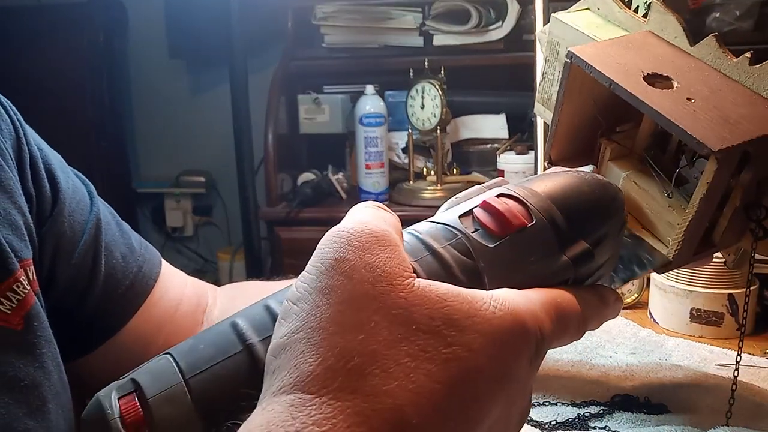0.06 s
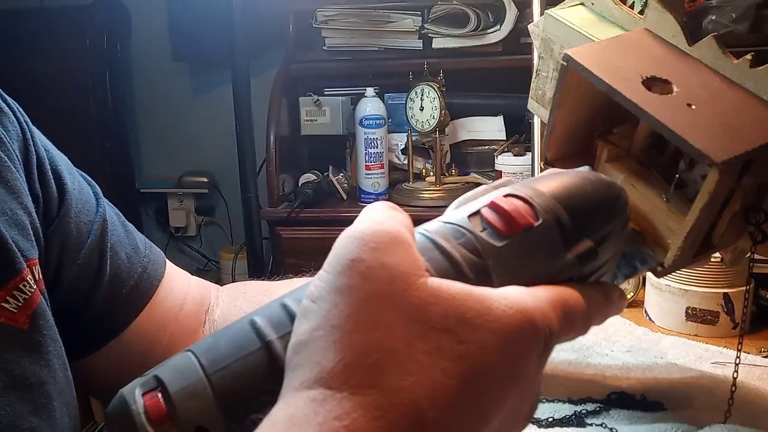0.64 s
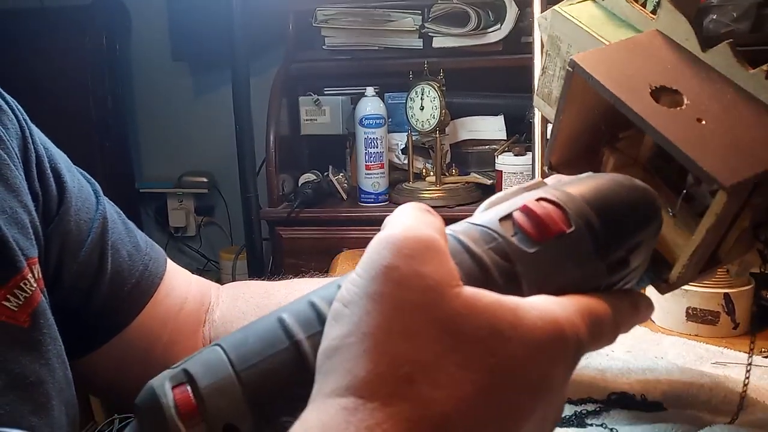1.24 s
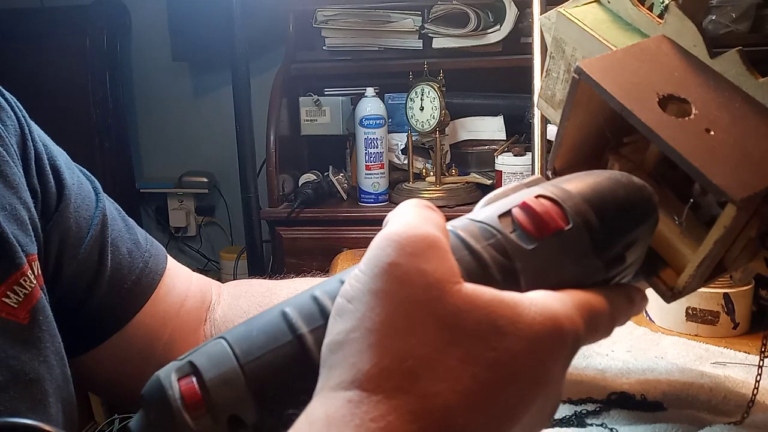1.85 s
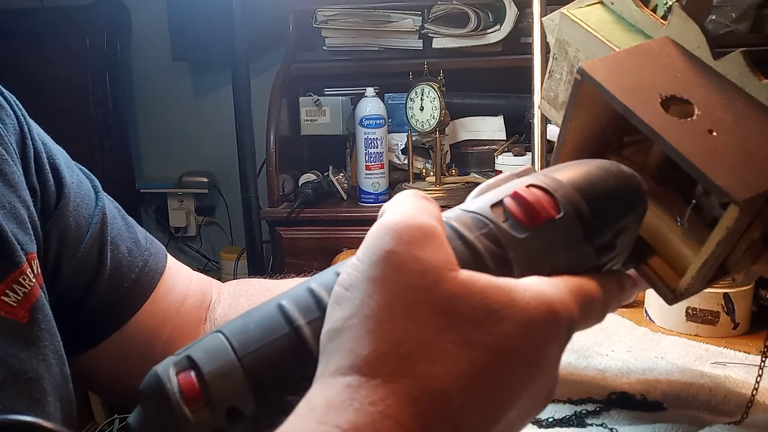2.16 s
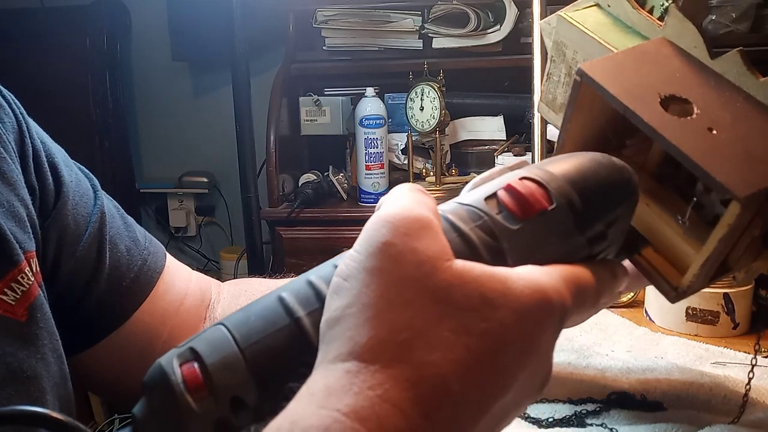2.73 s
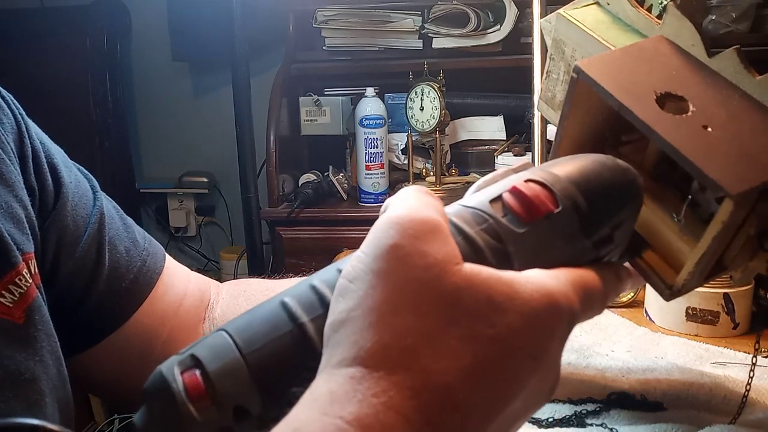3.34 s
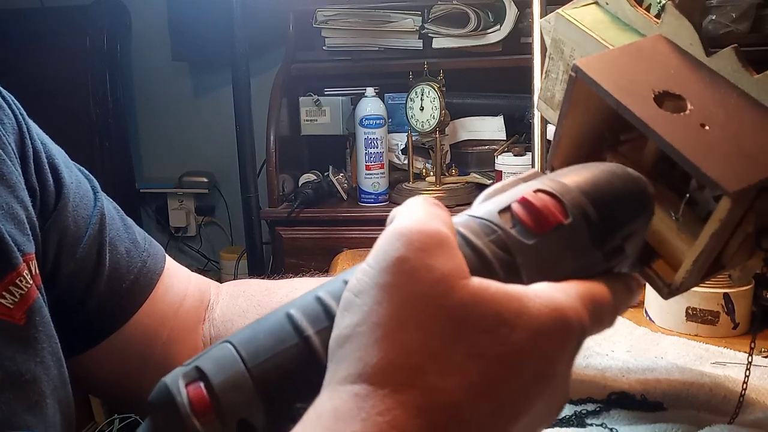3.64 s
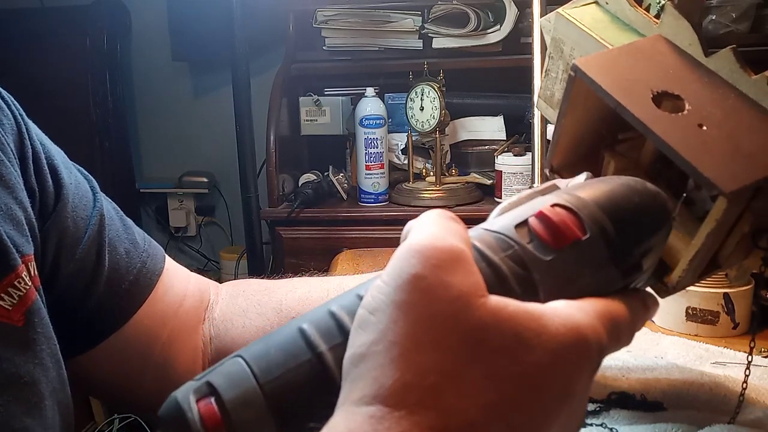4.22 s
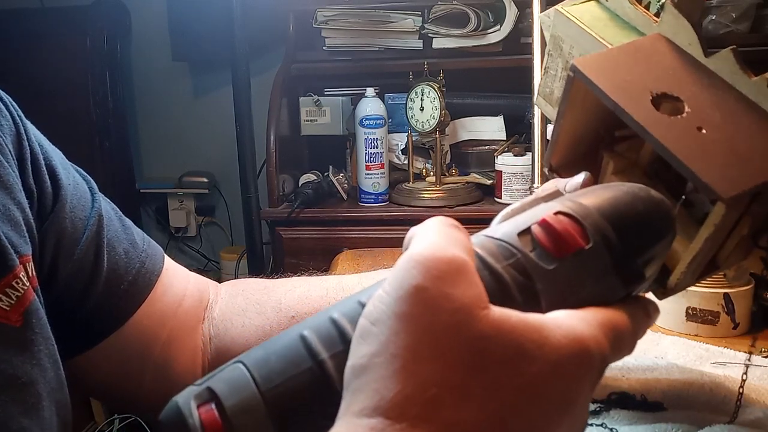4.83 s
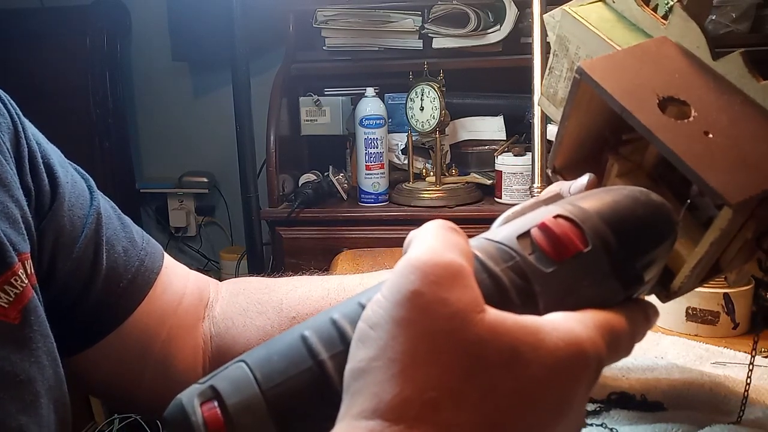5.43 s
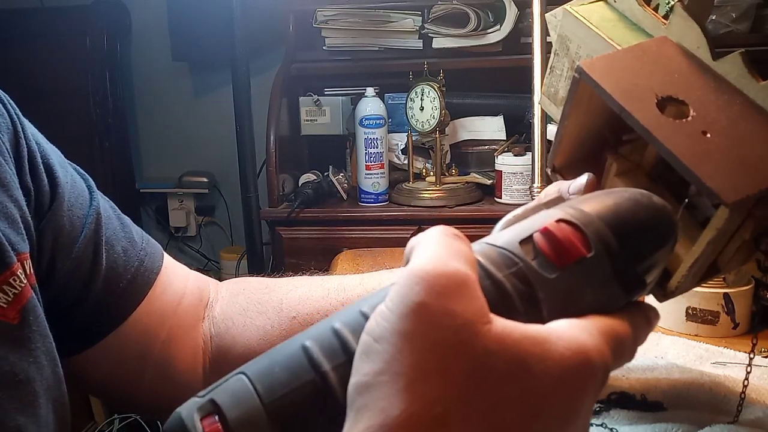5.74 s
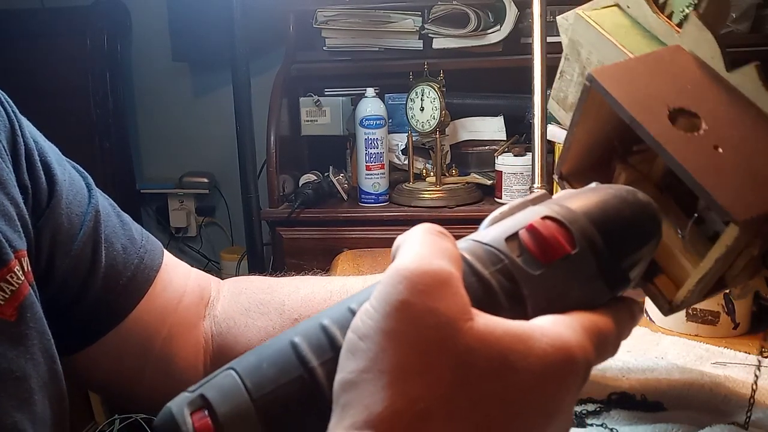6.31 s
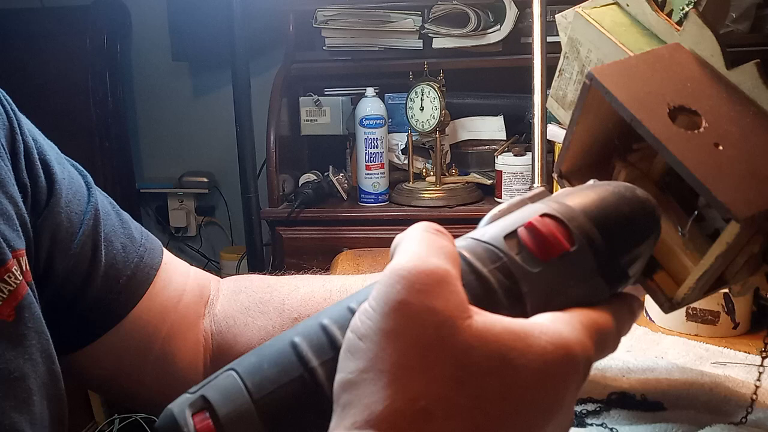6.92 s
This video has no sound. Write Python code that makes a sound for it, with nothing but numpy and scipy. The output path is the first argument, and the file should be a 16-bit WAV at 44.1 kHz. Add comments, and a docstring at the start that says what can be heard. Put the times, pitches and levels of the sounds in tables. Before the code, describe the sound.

Heard up close in a fairly dry workshop, an electric oscillating tool cuts glued wood without a pause. Its harsh buzz carries a dusty rasp and a wavering drone from the small wooden case. A few quick chatters and tiny squeaks come early on. Then the pitch drops as the blade sinks in, and gradually recovers, ending in a brighter, slightly whining buzz.

```python
"""A nasal buzz with a dry scrape starts at once: an oscillating multi-tool, held close, is cutting the
glued joint of a small wooden clock case. The blade skims, knocks and squeaks, then sinks in, and the
pitch sags and slowly recovers with the motor. Each swing of the blade shakes the case into a drone,
snaps against the cut and scrapes off dust. The buzz is made of harmonics: tones at 1, 2, 3... times
the swing rate. The depth of the cut runs from 0 (skimming) through 1 (biting) to 2 (running free)."""
import sys
import numpy as np
from scipy import signal
from scipy.fft import rfft, irfft
from scipy.io import wavfile

SR = 44100
rng = np.random.default_rng(int(sys.argv[2]) if len(sys.argv) > 2 else 0)


def store_wav(level_fs):
    """Save 16-bit WAV to argv[1]."""
    pcm = np.round(np.clip(np.atleast_2d(level_fs), -1, 1) * 32767)
    wavfile.write(sys.argv[1], SR, pcm.T.astype(np.int16))


N = 316197
TIME = np.arange(N) / SR
STEP = 40   # slow curves get one control point every STEP samples
MAINS_RIPPLE_HZ = 120   # mains power pulses at twice its own frequency


def from_db(db):
    """Turn decibels into a number to multiply a sound by."""
    return np.exp(np.asarray(db) * (np.log(10) / 20))


def rms_one(x):
    """Scale a signal so that its typical size (rms) is 1."""
    return x / np.sqrt(np.mean(x ** 2) + 1e-20)


def sine(turns):
    """A sine wave that makes one cycle per turn."""
    return np.sin((2 * np.pi * (turns - np.floor(turns))).astype(np.float32))


def in_time(rows):
    """Join a table's rows by straight lines: one curve for each column after the time."""
    times, *columns = np.transpose(rows)
    return [np.interp(TIME, times, column) for column in columns]


def at_hz(points, hz):
    """Look up a level between a table's frequencies, spaced like musical pitch."""
    frequencies, db = np.transpose(points)
    return np.interp(np.log(hz + 1e-9), np.log(frequencies), db)


def at_depth(values, depth):
    """Blend three values: for skimming, biting and running free."""
    return np.interp(depth, np.arange(3), values)


def ramp(middle_s, length_s):
    """A straight rise from 0 to 1, half done at middle_s."""
    return np.clip((TIME - middle_s) / length_s + .5, 0, 1)


def slow_drift(rate_hz):
    """Random wandering of typical size 1, at the control points."""
    r = np.exp(-2 * np.pi * STEP * rate_hz / SR)
    noise = rng.standard_normal(len(TIME[::STEP]) + 2000)
    return rms_one(signal.lfilter([1], [1, -2 * r, r * r], noise)[2000:])   # skip the settling


def smooth(points):
    """Join control points by straight lines."""
    return np.interp(TIME, TIME[::STEP], points)


def drift(rate_hz):
    """Random wandering of typical size 1, at every sample."""
    return smooth(slow_drift(rate_hz))


def butter(x, hz, kind, order=2):
    """Keep the "low" part, the "high" part or a "band" of a sound."""
    return signal.sosfilt(signal.butter(order, hz, kind, fs=SR, output="sos"), x)


def ring(x, hz, t60):
    """A resonance: each click starts a tone that fades by 60 dB in t60 seconds."""
    r = np.exp(-np.log(1000) / (t60 * SR))
    w = 2 * np.pi * hz / SR
    return signal.lfilter([0, np.sin(w)], [1, -2 * r * np.cos(w), r * r], x + 1e-18)


def narrow_noise(hz, width_hz):
    """Noise through one resonance: a rough whistle of typical size 1."""
    return rms_one(ring(rng.standard_normal(N), hz, np.log(1000) / (np.pi * width_hz)))


def coloured(x, spectrum, size=2048):
    """Give a sound a tone colour, with no ringing ahead of it (a minimum-phase filter)."""
    cepstrum = irfft(np.log(from_db(at_hz(spectrum, np.fft.rfftfreq(size, 1 / SR)))))
    cepstrum[1:size // 2] *= 2
    cepstrum[size // 2 + 1:] = 0
    return signal.oaconvolve(x, irfft(np.exp(rfft(cepstrum))))[:N]


def swings(speed, uneven_db, ripple_turns=0.0021, jitter_turns_per_db=-0.0052):
    """Count the swings, one turn each; mains ripple and an uneven cut disturb their timing."""
    ripple = ripple_turns * np.sin(2 * np.pi * MAINS_RIPPLE_HZ * TIME)
    return np.cumsum(speed) / SR + ripple + jitter_turns_per_db * uneven_db * drift(34)


def drone(turn, speed, flutter_db=1.33, wander_db=1.3, ramp_s=.08, chatter_hz=25, chatter_db=1.8):
    """The tool's housing and the case give off the low harmonics, which waver as the contact shifts."""
    # shaking of the housing: (time [s], harmonic 1 [dB], harmonic 2 [dB])
    shake = [(0, -44.5, -39), (1.3, -45, -50), (1.8, -42.5, -48), (2.15, -49, -58), (2.45, -43, -50),
             (3.0, -49.5, -46.5), (3.7, -48, -50), (4.5, -41, -43.5), (5.25, -50.5, -39), (5.82, -52, -59),
             (6.4, -54.5, -50), (7.17, -65, -45)]
    # how firmly the blade drives the case: (time [s], level [dB])
    drive = [(0, -2.5), (.66, -8), (.75, 0), (.87, 0), (1.0, 5), (1.35, 9.5), (1.7, 0), (2.05, 3),
             (2.35, 0), (2.65, -8), (2.8, -3), (3.3, -2), (3.7, 0), (4.35, -1), (4.57, -4), (4.8, -1.5),
             (5.3, -.5), (5.9, -2.5), (6.08, 2), (7.17, 0)]
    # one stroke presses harder than the other: (time [s], boost of even harmonics [dB])
    lopsidedness = [(0, -4), (1.3, -7), (1.7, -2), (2.9, -8), (3.7, 1), (5.3, 3), (6.1, -1.5), (7.17, -13)]
    # how well the case gives off sound: (frequency [Hz], level [dB])
    case_response = [(485, -43), (520, -33), (620, -27.3), (690, -28.3), (740, -33), (790, -31.5),
                     (860, -36), (1000, -29), (1100, -31.5), (1220, -30.5), (1340, -28.5), (1480, -30),
                     (1800, -27)]
    # the case sings along with a harmonic or smothers it: (start [s], end [s], harmonic, boost [dB])
    swells = [(.73, .86, 8, 13), (.73, 1.12, 7, 3), (.87, 1.2, 6, 4.5), (1.12, 1.47, 7, 7.5),
              (1.0, 1.32, 5, 2), (1.46, 1.64, 5, 9), (1.5, 1.9, 4, 5), (1.92, 2.06, 8, 9),
              (1.92, 2.17, 7, 4.5), (2.08, 2.27, 4, -6), (2.65, 3.45, 4, -5), (2.72, 3.4, 7, 8),
              (2.78, 3.6, 8, 8), (2.9, 3.25, 5, -7), (3.8, 5.52, 5, 8.5), (3.85, 4.33, 8, 8.5),
              (4.15, 4.45, 6, 4), (5.07, 5.5, 4, 4.5), (5.12, 5.52, 3, -5), (5.08, 5.82, 8, 7),
              (5.4, 5.65, 7, 7), (5.69, 5.81, 5, 10), (5.85, 6.27, 4, 5), (6.52, 6.87, 6, 15),
              (6.89, 7.25, 8, 17.5), (6.92, 7.25, 5, 5)]
    # mains throb adds a tone below each harmonic: (speed [swings/s], level against the harmonic [dB])
    side_tone = [(200, -19), (222, -13)]
    out = np.zeros(N)
    for k, level_db in zip((1, 2), in_time(shake)):
        out += from_db(level_db + wander_db * drift(3.5)) * sine(k * turn + rng.random())
    drive_db, even_db = in_time(drive) + in_time(lopsidedness)
    tremble_db = chatter_db * ramp(6.85, ramp_s) * sine(chatter_hz * TIME)   # fast flutter at the end
    throb = from_db(at_hz(side_tone, speed))
    for k in range(3, 9):
        swell_db = sum(db * (ramp(start, ramp_s) - ramp(end, ramp_s))
                       for start, end, harmonic, db in swells if round(harmonic) == k)
        push_db = drive_db + (k % 2 == 0) * even_db
        level_db = at_hz(case_response, k * speed) + push_db + swell_db + tremble_db
        unsteady_db = smooth(flutter_db * slow_drift(14.5) + wander_db * slow_drift(3.5))
        phase = k * turn + rng.random()
        tone = sine(phase) + throb * sine(phase - MAINS_RIPPLE_HZ * TIME)
        out += from_db(level_db + unsteady_db) * tone
    return out


def motor_hum(level_db=-74):
    """The motor's coils hum faintly at twice the mains frequency."""
    return from_db(level_db) * np.sin(2 * np.pi * MAINS_RIPPLE_HZ * TIME)


def snaps(turn, speed, depth, scatter_turns=.178, wander_db=2.9, pivot_hz=2000, head_lifts_s=6.3):
    """A snap each swing makes the high harmonics; paths through the case vary their timing and level."""
    # tone colour of the snaps: (frequency [Hz], relative level [dB])
    snap_colour = [(1300, 1), (1950, 1.5), (2200, -1.5), (2450, -7), (3250, -9), (4200, -14), (4550, -22.5),
                   (5000, -16.5), (5600, -18.5), (6600, -25.5), (7500, -21.5), (7900, -27.5), (11000, -35)]
    # tool head resonances that whine as a harmonic passes: (frequency [Hz], width [Hz], full boost [dB])
    head_resonances = [(2660, 110, 6), (3275, 120, 9.5), (3640, 70, 8), (5270, 69, 4)]
    # strength of the snaps: (skimming [dB], biting [dB], running free [dB])
    snap_db = (-37, -24.3, -25.7)
    # tilt towards the treble: (skimming, biting, running free), each [dB per octave]
    snap_brightness = (1, -1.8, 2.3)
    hz = np.linspace(1000, 12000, 2201)
    colour_db = at_hz(snap_colour, hz)
    whine_db = sum(db / (1 + (2 * (hz - centre) / width) ** 2) for centre, width, db in head_resonances)
    # leaning on the wood damps the head; it rings fully once it lifts off
    whine_share = .4 + .6 * ramp(head_lifts_s, length_s=.25)[::STEP]
    brightness = at_depth(snap_brightness, depth[::STEP])
    out, power = np.zeros(N), 0
    for k in range(9, 46):
        pitch = k * speed[::STEP]
        response_db = np.interp(pitch, hz, colour_db) + whine_share * np.interp(pitch, hz, whine_db)
        tilt_db = brightness * np.log2(pitch / pivot_hz)
        gain = from_db(response_db + tilt_db + wander_db * slow_drift(3.1))
        out += smooth(gain) * sine(k * turn + smooth(scatter_turns * slow_drift(0.84)))
        power = power + gain ** 2 / 2
    return from_db(at_depth(snap_db, depth)) * out / smooth(np.sqrt(power))


def strokes(turn, depth, uneven_db, burst_turns=0.067, touch_db=-3.0, touch_lead_turns=.18):
    """Each swing the teeth touch, then catch: two noise bursts of uneven strength over a steady rub."""
    # share of the rubbing that comes in bursts: (skimming, biting, running free), each [0-1]
    burst_share = (.3, .2, .64)
    touch, catch = (np.exp(-.5 * (((turn + lead + .5) % 1 - .5) / burst_turns) ** 2)
                    for lead in (touch_lead_turns, 0))
    swing_strength = from_db(uneven_db * rng.standard_normal(N)[np.round(turn).astype(int)])
    bursts = rms_one((catch + from_db(touch_db) * touch) * swing_strength)
    share = at_depth(burst_share, depth)
    return rms_one(rng.standard_normal(N) * np.sqrt(1 - share + share * bursts ** 2))


def scraping(force, depth, grip_db, low_cut_hz=95):
    """Rubbing heard through blade and case: depth sets its tone colour, a harder grip makes it louder."""
    # tone colour at each depth: (frequency [Hz], relative level [dB])
    skimming = [(100, -29.5), (300, -20.5), (420, -18.5), (600, -4.5), (1700, 4), (2500, -9), (3900, -11),
                (4600, -21), (6200, -14), (8100, -31), (9200, -26.5), (11200, -30.5), (12200, -46),
                (15600, -37)]
    biting = [(100, -43), (250, -30), (400, -30.5), (620, -13.5), (900, -12.5), (1800, 2), (2700, -6.5),
              (3700, -13.5), (4500, -21), (5700, -16.5), (8000, -24), (9600, -23.5), (12300, -34.0),
              (15600, -31.5)]
    running_free = [(100, -44), (290, -28.5), (470, -23), (560, -7.5), (1000, -11), (1750, 4.5),
                    (2600, -5.5), (4000, -9.5), (4500, -17), (5300, -12.5), (7400, -18.5), (10900, -25.5),
                    (11900, -33.5), (15600, -29.5)]
    # low, middle and high parts: (skimming [dB], biting [dB], running free [dB], share of grip [0-1])
    rumble = (-30, -37, -39.5, .35)
    rasp = (-24.7, -24.3, -28.4, 1.0)
    hiss = (-30.6, -28.5, -29.7, .22)
    bands_hz = [(300, 1000), (1000, 2800), (2800, 16000)]
    splitters = [signal.butter(3, high, fs=SR, output="sos") for _, high in bands_hz[:2]]
    gains = [from_db(at_depth(levels_db, depth) + share * grip_db)
             for *levels_db, share in (rumble, rasp, hiss)]
    hz = np.fft.rfftfreq(N, 1 / SR)
    out = np.zeros(N)
    for stage, spectrum in enumerate((skimming, biting, running_free)):
        weight = np.clip(1 - abs(depth - stage), 0, 1)
        sound = coloured(force, spectrum)
        power = from_db(at_hz(spectrum, hz)) ** 2 / len(hz)
        below_rasp, below_hiss = (signal.sosfiltfilt(splitter, sound) for splitter in splitters)
        parts = (below_rasp, below_hiss - below_rasp, sound - below_hiss)
        for part, gain, (low, high) in zip(parts, gains, bands_hz):
            band_size = np.sqrt(power[(hz > low) & (hz < high)].sum())
            out += weight * gain * part / band_size
    return butter(out, low_cut_hz, "high", order=3)


def high_whistles(depth, boost_db=3.5, fade_depth=.3):
    """Thin whistles while the cut is shallow: motor whine near 7.4 and 8.8 kHz, broader blade ringing."""
    # each whistle: (frequency [Hz], width [Hz], relative level [dB])
    whistles = [(3954, 93, -39), (7430, 14, -55), (8800, 22, -51.5), (11200, 120, -59), (14200, 250, -58),
                (15400, 130, -57)]
    whistling = sum(from_db(db) * narrow_noise(hz, width) for hz, width, db in whistles)
    return from_db(boost_db) * whistling / (1 + (depth / fade_depth) ** 4)


def knocks(turn, boost_db=0.5, uneven_db=1.3, contact_hz=5000, low_cut_hz=700):
    """While the blade bounces, it strikes the case at the end of every swing."""
    # spells of bouncing: (start [s], end [s], force at start [dB], force at end [dB])
    bounces = [(.529, 0.554, -3.5, -11), (0.717, 0.775, -9.5, -8.5), (0.79, 0.84, -14, -16),
               (.909, 0.957, -7, -8.5), (0.972, 0.987, -14, -15), (0.997, 1.007, -11, -10),
               (1.02, 1.076, -16, -12), (1.153, 1.233, -17, -17), (2.415, 2.456, -15, -18),
               (2.535, 2.613, -19, -19), (5.06, 5.14, -16, -17)]
    # ringing of the struck case: (frequency [Hz], relative level [dB], time to fade by 60 dB [s])
    resonances = [(1250, -15, .007), (1520, -7.5, 0.012), (1720, -8, .016), (1970, -6, 0.012),
                  (3780, -16, .006), (6400, -20, .005)]
    swing_ends = np.flatnonzero(np.diff(np.floor(turn)) > 0)
    t = TIME[swing_ends]
    force = sum(from_db(np.interp(t, [start, end], [first, last])) * (t > start) * (t < end)
                for start, end, first, last in bounces)
    out = np.zeros(N)
    for hz, db, t60 in resonances:
        clicks = np.zeros(N)
        clicks[swing_ends] = force * from_db(boost_db + db + uneven_db * rng.standard_normal(len(t)))
        out += ring(clicks, hz, t60)
    # soft wood blunts the knock, and the small case gives off no bass
    return butter(out, [low_cut_hz, contact_hz], "band")


def squeaks():
    """The teeth squeak on the glue: short, rough whistles that swell and fade."""
    # each squeak: (middle [s], spread in time [s], frequency [Hz], width [Hz], level [dB])
    glue_squeaks = [(.585, .015, 14150, 300, -43), (0.66, .007, 6300, 120, -29),
                    (.652, .009, 14250, 300, -39), (.652, .009, 11200, 250, -41),
                    (0.72, .008, 8700, 600, -37), (.765, .015, 14250, 300, -46),
                    (.915, .015, 3540, 40, -25)]
    out = np.zeros(N)
    for middle, spread, hz, width, db in glue_squeaks:
        swell = np.exp(-.5 * np.minimum(((TIME - middle) / spread) ** 2, 50))
        out += from_db(db) * swell * narrow_noise(hz, width)
    return out


def workshop(x, echo_db=-15.0, t60=0.32, wall_cut_hz=5000, size=16384):
    """Add short, dull echoes from the bench and the crowded shelves."""
    t = np.arange(size) / SR
    dull_noise = butter(rng.standard_normal(size), wall_cut_hz, "low")
    tail = dull_noise * np.exp(-np.log(1000) * t / t60) * (t > .003)
    return x + from_db(echo_db) * signal.oaconvolve(x, tail / np.linalg.norm(tail))[:N]


def scene(hand_wobble_db=.65, catch_ramp_s=.025, bite_in_grip=.45, bite_in_scrape=.35):
    """Mix the sounds of tool and case; the hand's unsteady push shakes the level of the cutting."""
    # pace of the motor: (time [s], speed [swings/s])
    motor_speed = [(0, 221), (.3, 218.4), (.63, 216.3), (.87, 219.7), (1.2, 213.1), (1.5, 207), (1.86, 196),
                   (2.07, 179), (2.2, 163), (2.34, 158), (2.49, 155.4), (2.66, 153.5), (2.88, 169),
                   (3.12, 173), (3.48, 181.8), (3.72, 190.3), (3.83, 196), (4.08, 194), (4.26, 198.3),
                   (4.44, 199.2), (4.59, 195.7), (4.77, 201.5), (5.16, 200), (5.55, 211.6), (5.98, 221.3),
                   (6.09, 225), (6.18, 223.2), (6.39, 228), (6.54, 227.3), (6.69, 222), (6.9, 216.9),
                   (7.17, 215)]
    # stage of the cut: (time [s], depth [0-2])
    cut_depth = [(0, .3), (.6, .02), (1.5, .62), (1.76, .62), (1.86, 1), (3.7, .92), (4.3, 1.65), (5.3, 2),
                 (7.17, 2)]
    # how much the swings vary in strength: (skimming [dB], biting [dB], running free [dB])
    unevenness = (2.5, 1.9, .6)
    # the blade briefly catches (+) or slips (-): (start [s], end [s], change in bite [dB])
    catches = [(.035, .06, 3), (.64, .662, 3.5), (.715, .79, 2.5), (1.45, 1.58, 3), (1.62, 1.74, -2),
               (1.92, 2.04, 2.5), (2.41, 2.47, 2.5), (2.53, 2.62, 3), (2.62, 2.71, -4), (3.11, 3.17, 2.5),
               (3.35, 3.44, -2), (3.45, 3.55, 3), (3.6, 3.78, 2), (5.84, 5.94, -2.5), (6.08, 6.3, 1.5),
               (6.93, 7.1, 1.5)]
    # how hard the teeth grip the wood: (time [s], level [dB])
    grip = [(0, -1), (.95, -.5), (1.06, 4.5), (1.4, 6), (1.65, -2), (1.78, 0), (2.05, -2), (2.4, 1.5),
            (2.8, 2), (3.55, .5), (3.95, -2), (4.38, -1.5), (4.53, 4), (4.7, 1.5), (5.25, 1.5), (5.9, -1),
            (6.2, -.5), (6.65, -3.5), (7.0, 0)]
    speed, depth = in_time(motor_speed) + in_time(cut_depth)
    uneven_db = at_depth(unevenness, depth)
    turn = swings(speed, uneven_db)
    catch_db = sum(db * (ramp(start, catch_ramp_s) - ramp(end, catch_ramp_s))
                   for start, end, db in catches)
    bite_db = hand_wobble_db * drift(9) + catch_db
    grip_db = in_time(grip)[0] + bite_in_grip * bite_db
    rubbing = strokes(turn, depth, uneven_db)
    scrape = from_db(bite_in_scrape * bite_db) * scraping(rubbing, depth, grip_db)
    snapping = from_db(bite_db) * snaps(turn, speed, depth)
    cutting = snapping + scrape + knocks(turn) + high_whistles(depth) + squeaks()
    return (drone(turn, speed) + motor_hum() + workshop(cutting))[None]


def record(dry, ceiling=2.2, cutoff_hz=15800):
    """Round off the tallest peaks and cut the highest treble."""
    rounded = ceiling * np.tanh(dry / ceiling)
    return signal.sosfilt(signal.ellip(12, .1, 90, cutoff_hz, fs=SR, output="sos"), rounded)


dry = scene()
out = record(dry)
store_wav(out)
```